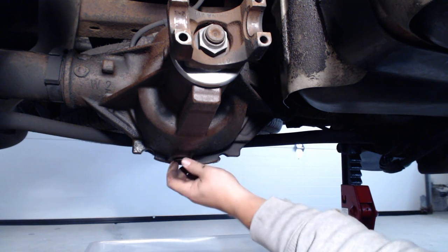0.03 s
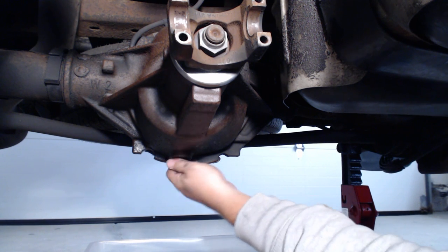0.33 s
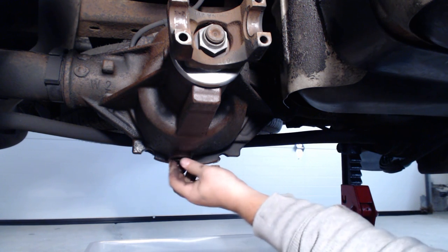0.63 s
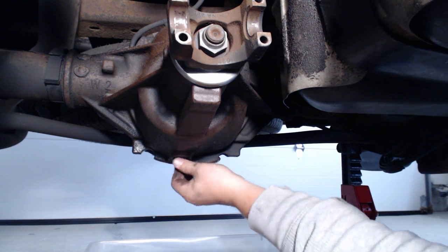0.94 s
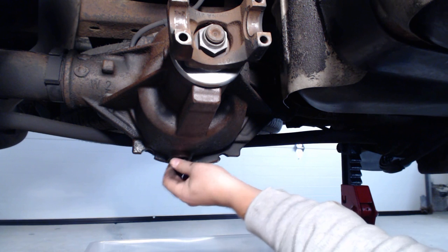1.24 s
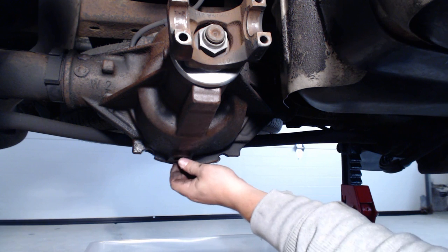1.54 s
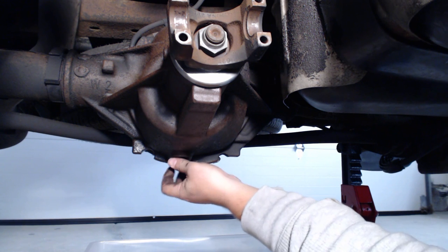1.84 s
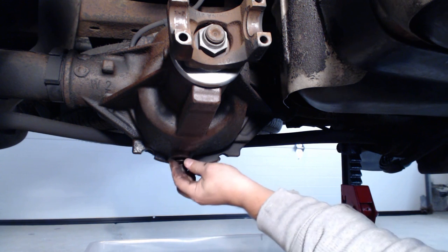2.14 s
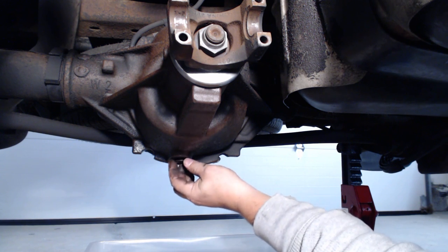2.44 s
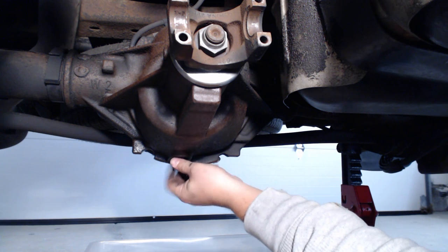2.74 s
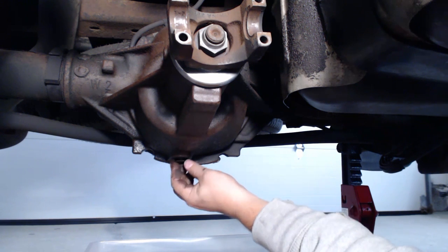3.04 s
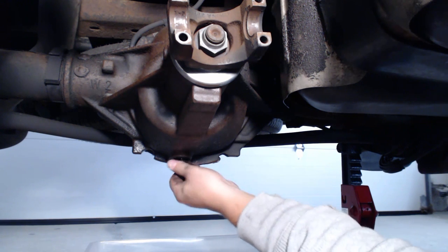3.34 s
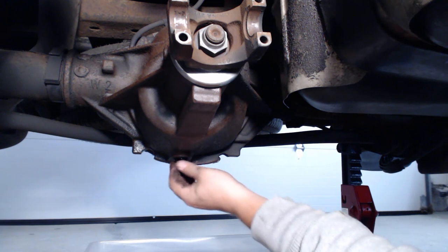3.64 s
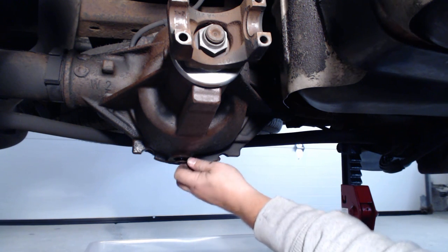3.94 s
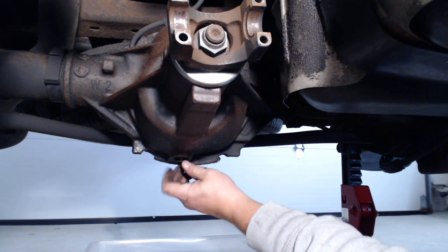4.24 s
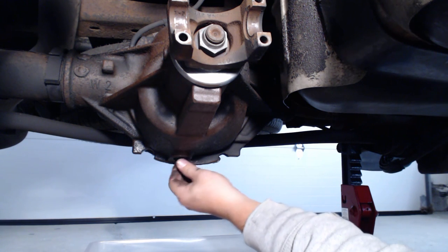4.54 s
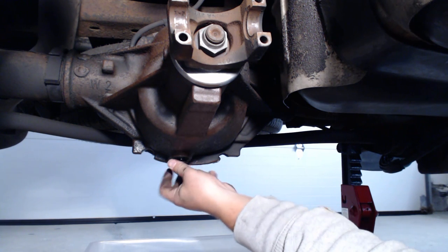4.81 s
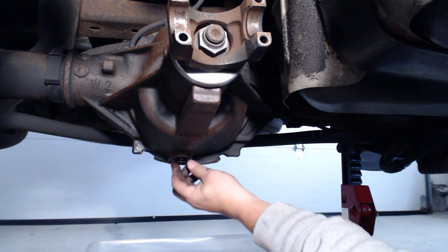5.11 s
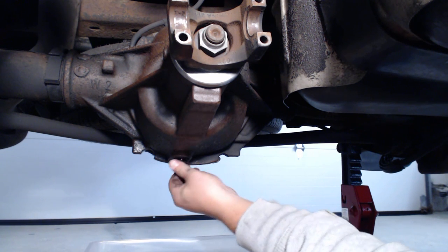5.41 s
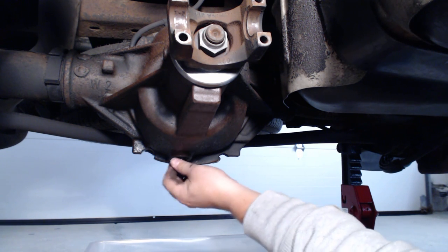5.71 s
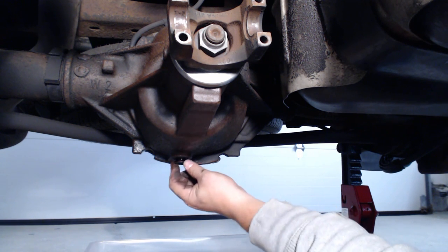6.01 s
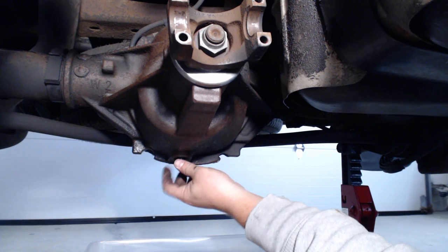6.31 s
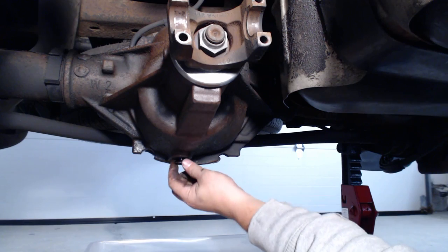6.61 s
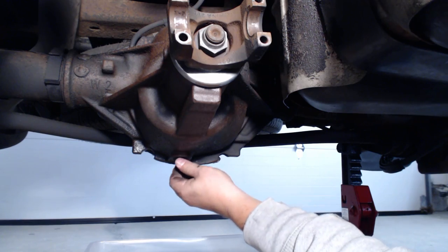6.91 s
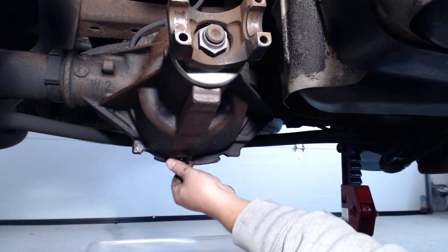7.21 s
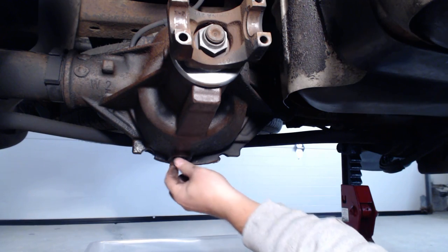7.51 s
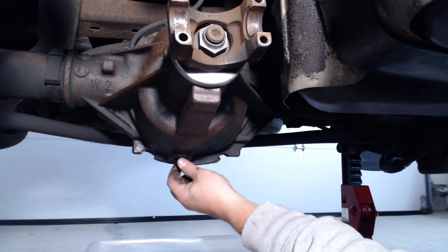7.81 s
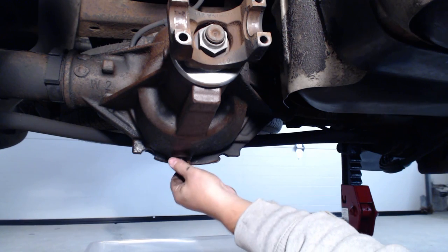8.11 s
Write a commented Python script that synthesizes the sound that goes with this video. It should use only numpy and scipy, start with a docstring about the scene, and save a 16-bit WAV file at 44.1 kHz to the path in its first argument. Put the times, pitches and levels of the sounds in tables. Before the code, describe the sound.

A steel drain plug is twisted out by hand under a vehicle, close by. Its gritty thread rasps in short, quiet strokes with tiny squeaks, light metal clicks and fingertip ticks. Early on, a heavy clank echoes from farther off, among a few dull knocks and faint engine revs. Near the end the plug gives one sharp, ringing clink. A soft rumble and machine hum fill the garage.

```python
"""A steel drain plug, unscrewed by hand from an axle housing under a lifted vehicle in a garage.
Grit rasps in the thread with each twist and the dry thread squeaks; the loose plug clacks across its
play and rings the steel. Fingertips tick off its head and brush the casting. Farther off: one heavy
clank, dull knocks, two engine revs, and the soft rumble and machine hum of the hall."""
import sys
import numpy as np
from scipy import signal
from scipy.fft import rfft, irfft, next_fast_len
from scipy.io import wavfile
from scipy.ndimage import uniform_filter1d, map_coordinates

SR = 44100
rng = np.random.default_rng(int(sys.argv[2]) if len(sys.argv) > 2 else 0)


def dump(signal):
    """Clip the signal to [-1, 1] and save it as 16-bit WAV at the path in sys.argv[1]."""
    limited = np.clip(np.atleast_2d(signal).T, -1, 1)
    pcm = np.round(limited * 32767).astype(np.int16)
    wavfile.write(sys.argv[1], SR, pcm)


N = 359415


def amp(db):
    """Decibels to gain."""
    return 10 ** (np.asarray(db) / 20)


def unit(x):
    """Scale to rms 1."""
    return x / np.sqrt(np.mean(x ** 2) + 1e-20)


def along(points, hz):
    """Interpolate (f/Hz, value) points on a log frequency axis."""
    f, values = np.transpose(points)
    return np.interp(np.log(hz + 1), np.log(f + 1), values)


def resonances(modes, hz):
    """Summed gain of (f/Hz, width/Hz, level/dB) peaks."""
    return sum(amp(db) / (1 + (2 * (hz - f) / width_hz) ** 2) for f, width_hz, db in modes)


def hump(hz, centre_hz, half_width_oct):
    """Broad peak of height 1."""
    return 1 / (1 + (np.log2((hz + 1) / centre_hz) / half_width_oct) ** 2)


def wobble(rate_hz):
    """Smooth random curve, rate_hz knots per second."""
    knots = rng.standard_normal(int(N * rate_hz / SR) + 4)
    return map_coordinates(knots, [np.arange(N) * rate_hz / SR])


def swell(start_s, length_s):
    """Half-sine envelope."""
    return np.abs(np.sin(np.pi * np.clip((np.arange(N) / SR - start_s) / length_s, 0, 1)))


def add(track, start_s, sound):
    """Mix a sound into the track in place."""
    part = track[max(round(start_s * SR), 0):][:len(sound)]
    part += sound[:len(part)]


def coloured(x, gain):
    """Minimum-phase filter with magnitude gain(hz)."""
    size = 2 * next_fast_len(len(x) // 2 + 4096)
    cepstrum = irfft(np.log(np.maximum(gain(np.fft.rfftfreq(size, 1 / SR)), 1e-6)))
    cepstrum[1:size // 2] *= 2
    cepstrum[size // 2 + 1:] = 0
    return irfft(rfft(x, size) * np.exp(rfft(cepstrum)))[:len(x)]


def hiss(spectrum):
    """Steady coloured noise, rms 1."""
    return unit(coloured(rng.standard_normal(N), lambda hz: amp(along(spectrum, hz))))


def ring(modes, attack_s):
    """One second of decaying modes, struck with random phase and slightly varied strength."""
    t = np.arange(SR) / SR
    out = np.zeros(SR)
    for hz, db, t60_s in modes:
        envelope = amp(db + rng.normal(0, 0.66) - 60 * t / t60_s)
        out += envelope * np.sin(2 * np.pi * (hz * t + rng.random()))
    return out * (1 - np.exp(-t / attack_s))


def burst(gain, t60_s, attack_s):
    """Decaying contact noise, rms 1 over its loudest 4 ms."""
    t = np.arange(SR // 4) / SR
    envelope = amp(-60 * t / t60_s) * (1 - np.exp(-t / attack_s))
    noise = coloured(rng.standard_normal(len(t)) * envelope, gain)
    return noise / np.sqrt(uniform_filter1d(noise ** 2, size=176).max())


def garage_tail(build_s):
    """Diffuse room response, energy 1: echoes build up, treble dies first."""
    # reverberation: f/Hz, t60/s
    decay = [(150, 0.87), (700, 1), (1500, 1.0), (3000, 0.93), (6000, 0.57), (10000, 0.39), (15000, 0.063)]
    hz, t, spectra = signal.stft(rng.standard_normal(SR * 5 // 4), SR, nperseg=256)
    tail = signal.istft(spectra * amp(-60 * t / along(decay, hz)[:, None]), SR, nperseg=256)[1]
    tail *= 1 - np.exp(-np.arange(len(tail)) / SR / build_s)
    return tail / np.linalg.norm(tail)


def in_garage(x, wet_db):
    """Direct sound plus reverberation."""
    response = amp(wet_db) * garage_tail(build_s=0.0015)
    response[0] += 1
    return signal.fftconvolve(x, response)


def hit(gain, t60_s, attack_s, wet_db):
    """Contact noise plus a room tail of the same colour."""
    near = burst(gain, t60_s, attack_s)
    wash = coloured(garage_tail(build_s=0.004), gain)
    out = amp(wet_db) * wash * np.linalg.norm(near) / np.linalg.norm(wash)
    add(out, 0, near)
    return out


def hall(air_db=-60, waver_db=4):
    """Low rumble, thin hiss and unsteady machine hum."""
    # room noise: f/Hz, relative density/dB
    air = [(12, -20), (20, -9), (80, -1.5), (362, -21), (404, -19), (906, -29), (1130, -26), (1340, -28.5),
           (1870, -32), (2210, -32), (2540, -33.5), (3750, -35.5), (4430, -37), (5850, -37.5),
           (15500, -42.5)]
    # machine tones: f/Hz, level/dB
    tones = [(48, -66.5), (70, -67.5), (124, -67.5), (166, -77)]
    t = np.arange(N) / SR
    hum = sum(amp(db + waver_db * wobble(2.2)) * np.sin(2 * np.pi * hz * t + 3 * wobble(8.7))
              for hz, db in tones)
    return amp(air_db) * hiss(air) + hum


def engine(idle_hz=52.1, rise_hz_per_s=8.4, waver_db=2.5):
    """A far engine swells as its firing rate climbs with each rev."""
    # revs: t/s, length/s, level/dB
    revs = [(-0.2, 1, -64.5), (1.846, 0.66, -71)]
    # firing harmonics: order, relative level/dB
    harmonics = [(2, 3.5), (3, 2), (5, -8.5), (6, -15.5)]
    t, out = np.arange(N) / SR, np.zeros(N)
    for start_s, length_s, db in revs:
        firing_hz = idle_hz + rise_hz_per_s * np.clip(t - start_s, 0, length_s)
        phase = 2 * np.pi * np.cumsum(firing_hz) / SR
        drone = sum(amp(order_db + waver_db * wobble(8.5)) * np.sin(order * phase + 0.76 * wobble(8.7))
                    for order, order_db in harmonics)
        out += amp(db) * np.sqrt(swell(start_s, length_s)) * drone
    return out


def knocks(gain_db=-2):
    """Dull, ringless knocks excite the room."""
    # knocks: t/s, relative level/dB
    blows = [(1.266, -43.5), (2.045, -48), (2.958, -44.5), (3.17, -49), (5.75, -59), (7.058, -45),
             (7.715, -45)]
    # knock spectrum: f/Hz, relative density/dB
    dull = [(80, -9), (200, -24), (320, 3), (520, -2), (720, -2.5), (1100, 5), (1700, -8), (2300, -7.5),
            (4000, -27.5), (9000, -34), (15000, -53)]
    out = np.zeros(N)
    for start_s, db in blows:
        knock = hit(lambda hz: amp(along(dull, hz)), t60_s=0.094, attack_s=0.00071, wet_db=-5)
        add(out, start_s, amp(db + gain_db) * knock)
    return out


def clank(thud_fade_db_per_s=14, ring_fade_db_per_s=3):
    """A heavy object lands far off and settles, heard as reverberation; its ring outlasts the thud."""
    # contacts: t/s, thud level/dB, ring level/dB
    contacts = [(1.574, -36.5, -59), (1.583, -27.5, -45), (1.606, -41, -28.5), (1.695, -47, -37.5),
                (1.74, -40.5, -48)]
    # thud spectrum: f/Hz, relative density/dB
    thud_spectrum = [(60, -42), (160, -5.5), (215, -13), (260, -5), (400, 0.5), (720, 6.5), (900, -7),
                     (1400, 2.5), (1570, -3), (2050, 3), (2400, -7.5), (3300, -12), (4200, -22),
                     (7000, -35), (15000, -67)]
    # body modes: f/Hz, width/Hz, relative level/dB
    body_modes = [(421, 13, -14.5), (452, 8.3, -29), (583, 10, -14), (710, 13, -1.5), (760, 30, -2),
                  (775, 29, -5), (1367, 12, -12), (1660, 32, -19), (1817, 32, -19), (2125, 62, -17.5),
                  (3480, 61, -26), (4620, 110, -31.5)]
    out = np.zeros(N)
    for start_s, thud_db, ring_db in contacts:
        thud = thud_db, thud_fade_db_per_s, lambda hz: amp(along(thud_spectrum, hz))
        body = ring_db, ring_fade_db_per_s, lambda hz: resonances(body_modes, hz)
        for db, fade_db_per_s, colour in thud, body:
            wash = coloured(garage_tail(build_s=0.00075), colour)
            wash *= amp(-fade_db_per_s * np.arange(len(wash)) / SR)  # on top of the room's decay
            wash *= np.sqrt(SR / 20) / np.linalg.norm(wash)  # energy of 50 ms at rms 1
            add(out, start_s, amp(db) * wash)
    return out


def fingers(tick_db=-5, flutter_db=3.04):
    """Fingertips flick off the plug head; skin and sleeve brush the casting."""
    # fingertip slips: t/s, relative level/dB
    ticks = [(1.362, -61.5), (1.484, -58), (1.9979, -56), (2.7147, -58), (2.9597, -59), (3.6298, -55),
             (3.8288, -62), (3.965, -46.5), (4.0123, -43.5), (4.142, -61), (4.177, -50), (4.361, -55),
             (4.374, -49), (4.6525, -57), (4.9593, -56), (5.1746, -56), (5.7684, -57), (6.2502, -45.5),
             (6.327, -57.5), (6.4374, -60.5), (7.4696, -55)]
    # tick spectrum: f/Hz, relative density/dB
    skin = [(200, -14.5), (900, -0.5), (2500, 0.5), (4500, 0), (8000, 0.5), (10000, -13), (15500, -11)]
    # brush strokes: t/s, length/s, level/dB
    brushes = [(0.0, 0.051, -61), (0.019, 0.23, -63.5), (0.293, 0.137, -65.5), (0.67, 0.06, -64.5),
               (0.761, 0.092, -66.5), (0.965, 0.23, -66.5), (1.398, 0.12, -71), (1.78, 0.16, -67),
               (2.074, 0.27, -67.5), (3.728, 0.065, -68), (5.145, 0.075, -74), (7.746, 0.082, -73.5)]
    # brush spectrum: f/Hz, relative density/dB
    cloth = [(200, 8), (1200, -0.5), (3000, 1.5), (5500, -1), (7900, 3.5), (9500, -10), (15500, -10.5)]
    out = np.zeros(N)
    for peak_s, db in ticks:
        tick = burst(lambda hz: amp(along(skin, hz)), t60_s=0.086, attack_s=0.0017)
        add(out, peak_s - 0.002, amp(db + tick_db) * tick)
    touch = sum(amp(db) * swell(start_s, length_s) ** 0.53 for start_s, length_s, db in brushes)
    out += touch * amp(flutter_db * wobble(45)) * hiss(cloth)
    return in_garage(out, wet_db=-16)[:N]


def housing(hz, base_db):
    """Gain of the axle housing: resonances over a flat base."""
    # casting modes: f/Hz, width/Hz, level/dB
    modes = [(1300, 400, -9.5), (2270, 270, 2), (2790, 90, -0.5), (3126, 160, 5), (3688, 170, 3.5),
             (4205, 220, -3.5), (4790, 80, -3.5), (5100, 77, -8.5), (5700, 230, -5), (6750, 170, -8)]
    return amp(base_db) + resonances(modes, hz)


def squeaks(pitch_hz=2260, waver_hz=130, flutter_db=2.7):
    """Stick-slip of the dry thread at one wavering pitch."""
    # squeaks: t/s, length/s, level/dB
    slips = [(3.466, 0.069, -56.5), (3.916, 0.022, -52), (6.221, 0.065, -54.5), (6.624, 0.11, -71)]
    phase = 2 * np.pi * np.cumsum(pitch_hz + waver_hz * wobble(400)) / SR
    envelope = sum(amp(db) * swell(start_s, length_s) for start_s, length_s, db in slips)
    return in_garage(envelope * amp(flutter_db * wobble(150)) * np.sin(phase), wet_db=-17)[:N]


def twisting(grip_s=0.015, release_s=0.025, swell_db=7, ease_db=12, treble_db_per_db=0.1):
    """Each twist grips, pushes, eases and lets go; returns the rasp's gain, treble and band centre."""
    # twists: t/s, time to hardest push/s, length/s, relative level/dB, relative treble/dB, centre f/Hz
    twists = [(0.305, 0.2, 0.35, -56.5, -2.5, 2260), (0.985, 0.026, 0.14, -55, -8.5, 2400),
              (1.095, 0.039, 0.19, -50, -8, 2230), (2.69, 0.16, 0.26, -57, -8, 1940),
              (3.335, 0.18, .255, -53, -4.5, 2420), (3.912, 0.053, 0.09, -49.5, -6, 2250),
              (3.99, 0.033, .045, -47, -7, 3800), (4.646, 0.053, 0.14, -49, -11.5, 1680),
              (4.76, 0.041, 0.16, -53, -6, 2480), (5.465, .125, .23, -56, -4, 3140),
              (6.16, .035, 0.076, -61.5, -16.5, 1860), (6.225, .035, 0.16, -51, -11, 1490),
              (6.61, .04, 0.17, -73, -12.5, 2100), (7.31, .025, 0.093, -59.5, -7, 2010),
              (7.61, .05, 0.12, -67, -6.5, 1624)]
    t = np.arange(N) / SR
    gain, treble_db = np.zeros(N), np.zeros(N)
    centre_hz = np.full(N, float(twists[0][-1]))
    for start_s, push_s, length_s, db, bright_db, hz in twists:
        age_s = t - start_s
        grip = np.clip(np.minimum(age_s / grip_s, (length_s - age_s) / release_s), 0, 1)
        effort_db = np.interp(age_s, [0, push_s, length_s], [-swell_db, 0, -ease_db])
        gain += grip * amp(db + effort_db)
        treble_db = np.where(age_s > 0, bright_db + treble_db_per_db * effort_db, treble_db)
        centre_hz[age_s > 0] = hz
    return gain, treble_db, centre_hz


def thread(grains_per_s=4500, chatter_db=3, band_db=8, wander_oct=0.19, gain_db=-1, tilt_db=-1):
    """Grit slips in tiny grains; the rasp's strongest band wanders and shifts with each new grip."""
    # grit spectrum: f/Hz, relative density/dB
    grit = [(80, -43.5), (400, 2.5), (800, -2.5), (1300, 1), (2400, -7.5), (4000, -9.5), (7000, -12),
            (9500, -19.5), (15500, -35)]
    gain, treble_db, centre_hz = twisting()
    grains = (rng.random(N) < grains_per_s / SR) * rng.standard_normal(N)
    grains *= amp(-0.5 * np.minimum(rng.exponential(size=N), 3))
    grains *= amp(chatter_db * wobble(55))
    rasp = coloured(grains, lambda hz: amp(along(grit, hz)) * housing(hz, base_db=-6.5))
    hz, frames_s, spectra = signal.stft(rasp, SR, nperseg=512)
    band_hz = np.interp(frames_s, np.arange(N) / SR, centre_hz * 2 ** (wander_oct * wobble(18)))
    spectra = spectra * amp(band_db * hump(hz[:, None], band_hz, half_width_oct=0.56))
    rasp = signal.istft(spectra, SR, nperseg=512)[1][:N]
    low = signal.sosfiltfilt(signal.butter(3, 3800, fs=SR, output="sos"), rasp)
    treble = amp(treble_db + tilt_db) * unit(rasp - low)
    return in_garage(gain * amp(gain_db) * (unit(low) + treble), wet_db=-10.5)[:N]


def plug(hard_db=-37, spread_oct=0.65, doubling_db=21.5, ring_db=-21.5, ring_db_per_db=0.09):
    """The loose plug snaps across its play and rebounds once: a crack, then ringing steel."""
    # clacks: t/s, level/dB, centre f/Hz
    clacks = [(1.068, -49, 1480), (1.127, -53, 3600), (3.349, -57.5, 1900), (3.405, -58, 4400),
              (3.962, -49, 2580), (3.997, -51, 4100), (4.005, -52, 800), (4.671, -52, 1600),
              (4.77, -51.5, 4400), (5.086, -55, 2090), (5.437, -53.5, 3600), (5.881, -37.5, 2800),
              (6.248, -48, 2200), (6.8475, -17.5, 4770), (7.966, -43, 1606)]
    # crack spectrum: f/Hz, relative density/dB
    crack = [(60, -25.5), (400, -5.5), (1050, -4.5), (1450, -1.5), (1850, -6), (3050, -4), (3600, -9.5),
             (6900, -5), (8400, -15), (9400, -13), (10300, -22), (12000, -22.5), (15500, -34)]
    # steel modes: f/Hz, relative level/dB, t60/s
    steel_modes = [(1455, 4, 0.43), (1537, 5.5, 0.27), (2070, -13.5, 0.23), (2260, -8, 0.45),
                   (2840, -8.5, .85), (3020, -5, 0.43), (3010, -5.5, 0.55), (3143, -1.5, 0.45),
                   (3193, -9.5, 0.45), (3700, -10, .35), (5080, -2, .15), (5300, -13.5, .25),
                   (6830, -12.5, .2)]
    rebounds = [(s + 0.0155, db - 8, hz * 0.75) for s, db, hz in clacks]  # later, softer, duller
    out = np.zeros(N)
    for start_s, db, centre_hz in list(clacks) + rebounds:
        excess_db = max(db - hard_db, 0)  # hard blows span a wider band and ring more
        half_width_oct = spread_oct * 2 ** (excess_db / doubling_db)
        contact = lambda hz: hump(hz, centre_hz, half_width_oct)
        colour = lambda hz: amp(along(crack, hz)) * contact(hz) * housing(hz, base_db=5)
        steel = coloured(ring(steel_modes, attack_s=0.00092), contact)
        add(out, start_s, amp(db) * hit(colour, t60_s=0.054, attack_s=0.0002, wet_db=-10.5))
        add(out, start_s, amp(db + ring_db + ring_db_per_db * excess_db) * in_garage(steel, wet_db=-14.5))
    return out


def scene():
    """Mono mix, heard from below the axle."""
    return (thread() + squeaks() + plug() + fingers() + knocks() + clank() + hall() + engine())[None]


def record(dry):
    """Brick-wall low-pass."""
    cutoff_hz = 15800
    size = next_fast_len(N + SR // 2)
    passband = np.fft.rfftfreq(size, 1 / SR) < cutoff_hz
    return irfft(rfft(dry, size) * passband, size)[:, :N]


dry = scene()
out = record(dry)
dump(out)
```